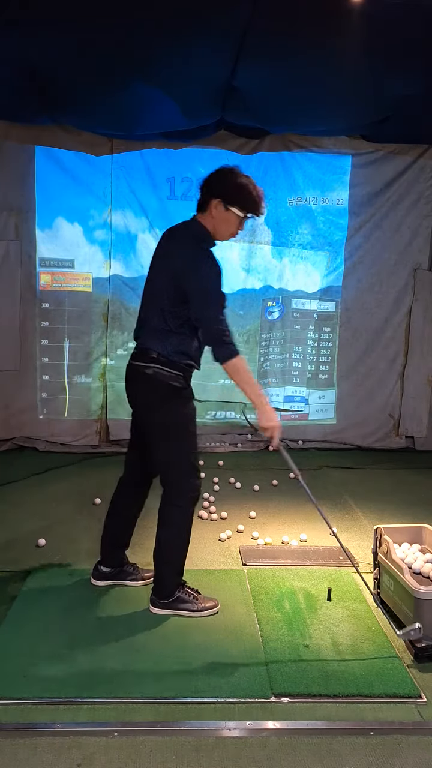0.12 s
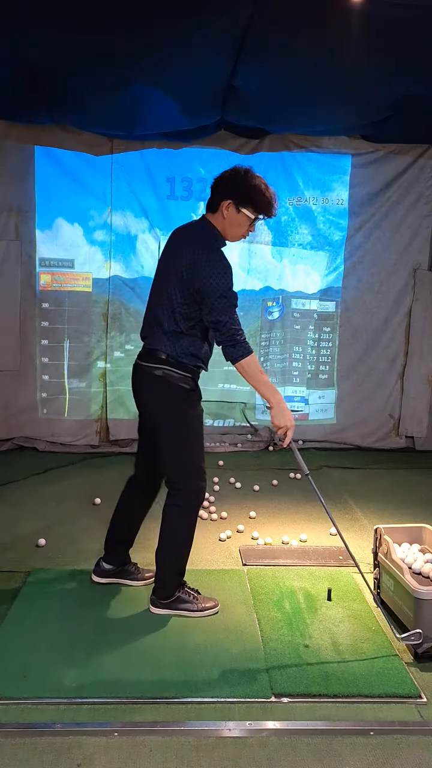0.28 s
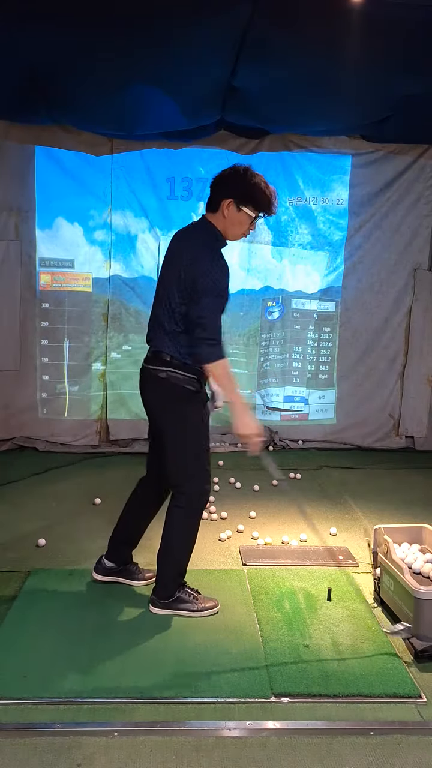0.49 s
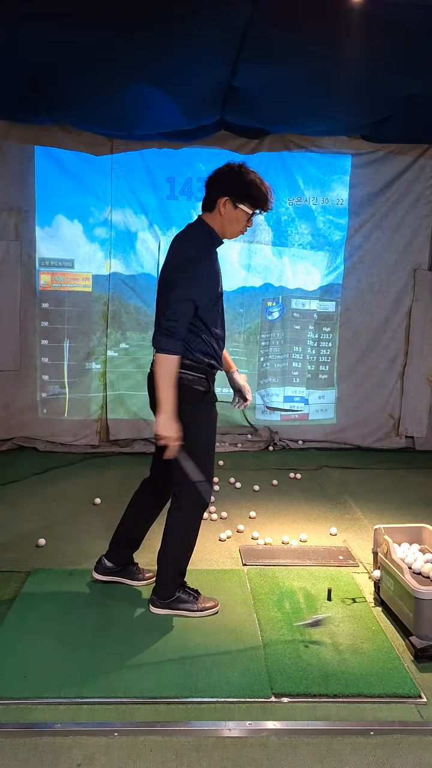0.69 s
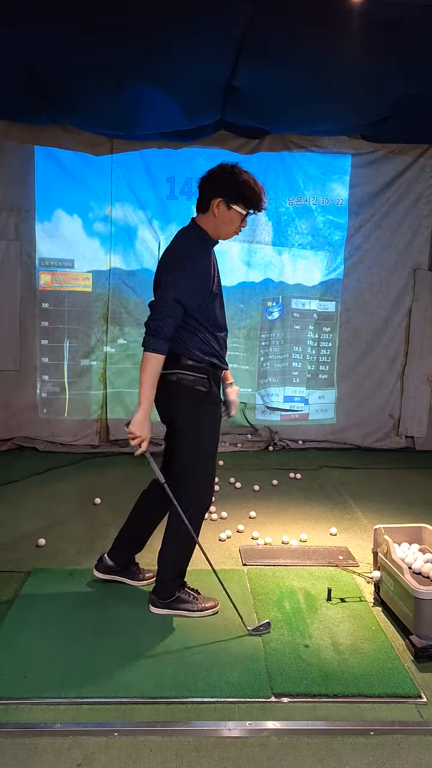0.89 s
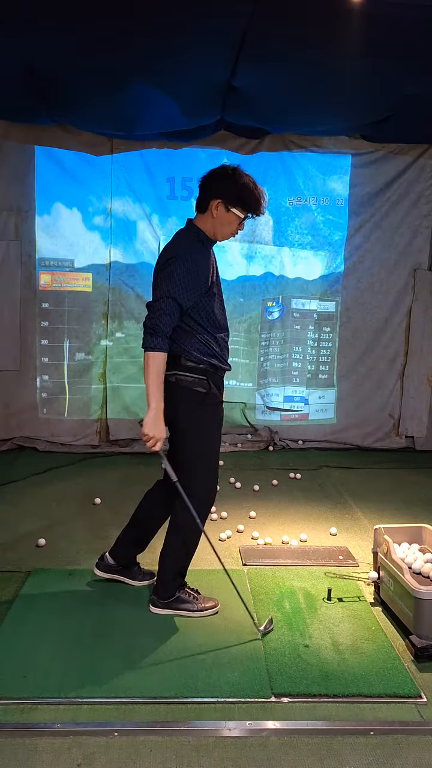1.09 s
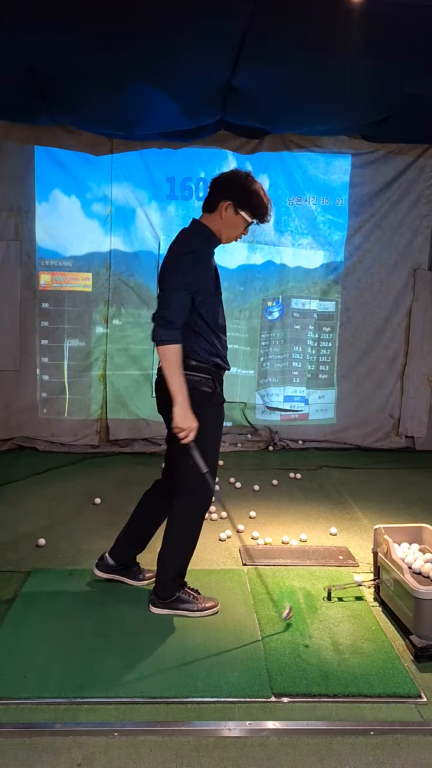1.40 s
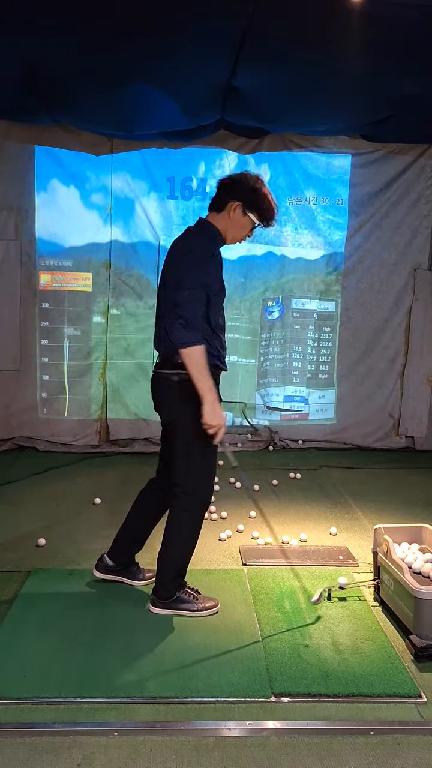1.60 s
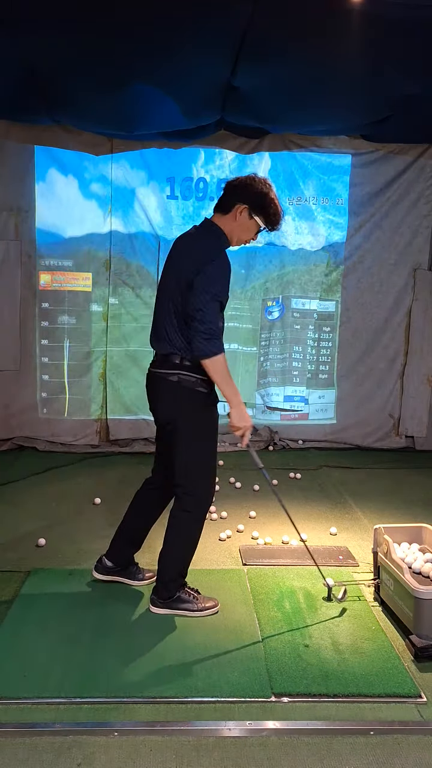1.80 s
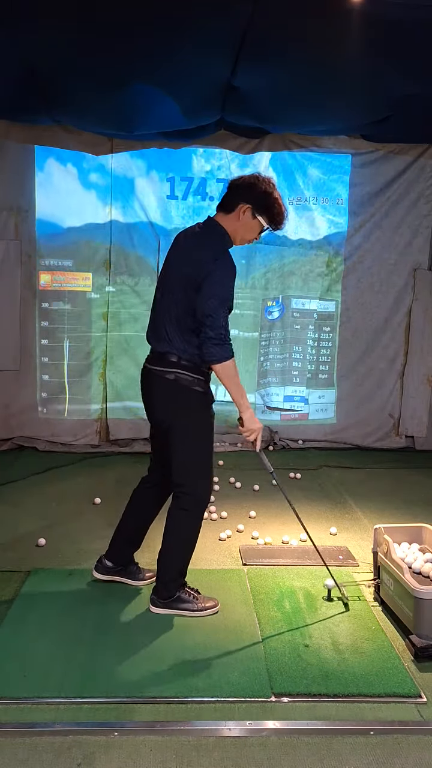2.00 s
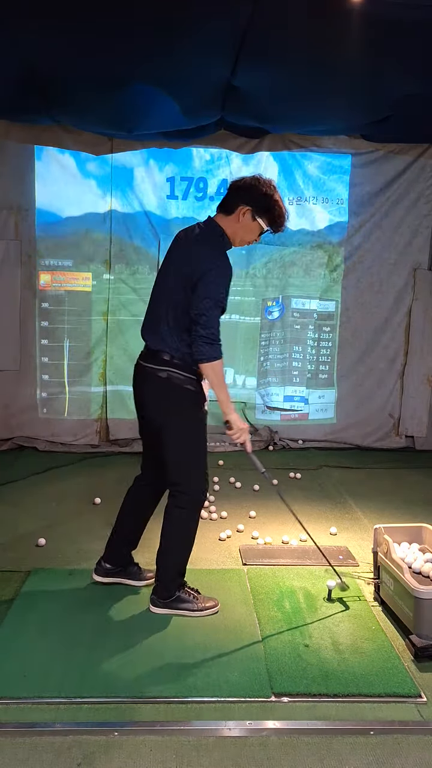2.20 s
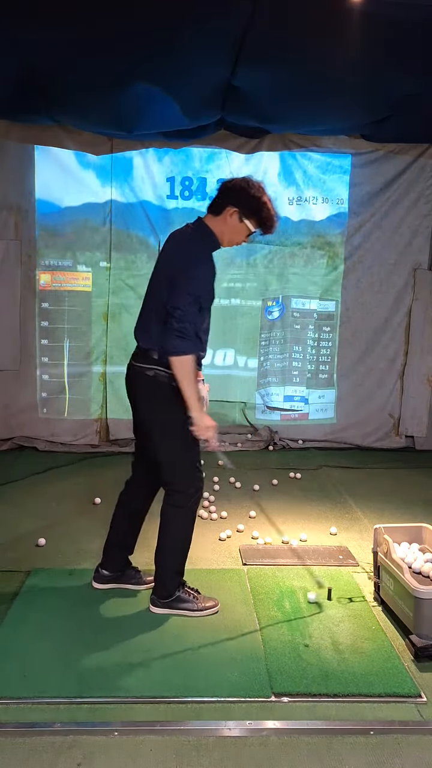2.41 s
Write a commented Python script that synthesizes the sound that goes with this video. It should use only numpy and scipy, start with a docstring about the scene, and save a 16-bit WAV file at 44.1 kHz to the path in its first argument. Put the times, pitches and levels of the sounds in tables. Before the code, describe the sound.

A club rakes golf balls in a hollow plastic tray with a sharp clatter, then brushes the mat

```python
"""Indoor golf bay, heard by a microphone pair over the steady ventilation rumble of a padded room.
First a club head rakes into a plastic tray of balls: random blows ring the tray, its floor and the balls,
which clatter, tumble again and settle. Then the head rubs the turf mat, as bristle clicks and a metal rasp,
and ticks on a ball; meanwhile a small motor hums (a gliding sine), and late on it whines (narrow noise)."""
import sys
import numpy as np
from scipy import signal
from scipy.fft import rfft, irfft, next_fast_len
from scipy.io import wavfile
from scipy.ndimage import uniform_filter1d

SR = 44100
rng = np.random.default_rng(int(sys.argv[2]) if len(sys.argv) > 2 else 0)


def digitize_waveform(pressure):
    """Quantize a signal to 16-bit integers and store it at the path in sys.argv[1].

    Rows of a 2-D input are taken as channels; values are limited to [-1, 1].
    """
    field = np.atleast_2d(pressure).T
    bounded = np.clip(field, -1, 1)
    quanta = np.round(bounded * 32767).astype(np.int16)
    wavfile.write(sys.argv[1], SR, quanta)


N = 114660  # samples, 2.6 s


def amp(db):
    """Amplitude ratio of a level in dB."""
    return 10 ** (np.asarray(db) / 20)


def evened(x):
    """Scales a signal to an RMS of 1."""
    return x / np.sqrt(np.mean(x ** 2) + 1e-20)


def read(points, hz):
    """Reads a table over frequency, joined by lines on a log axis."""
    f, value = np.transpose(points)
    return np.interp(np.log(hz + 1), np.log(f + 1), value)


def curve(rows, col):
    """One column of a table, joined by lines in time."""
    rows = np.array(rows)
    return np.interp(np.arange(N) / SR, rows[:, 0], rows[:, col])


def level(rows, col):
    """Gain from a dB column, with 22 ms fades inside the table's ends; one that reaches the end stays open."""
    t = np.arange(N) / SR
    start, end = rows[0][0], rows[-1][0]
    time_left = np.where(end > 2.59, 1, end - t)
    fade = np.clip(np.minimum(t - start, time_left) / 0.022, 0, 1)
    return amp(curve(rows, col)) * fade


def impulse(points):
    """The shortest causal (minimum-phase) click with this colour, energy 1."""
    log_gain = read(points, abs(np.fft.fftfreq(8192, 1 / SR))) * np.log(10) / 20
    spectrum = np.exp(np.conj(signal.hilbert(log_gain)))
    h = np.fft.ifft(spectrum).real[:2048]
    return h / np.linalg.norm(h)


def resonate(x, hz, width):
    """A one-pole resonance, turned to a fixed or moving pitch."""
    turn = np.exp(2j * np.pi * np.cumsum(hz * np.ones(N)) / SR)
    r = np.exp(-np.pi * width / SR)
    return 2 * (turn * signal.lfilter([1 - r], [1, -r], x / turn)).real


def resonant_noise(hz, width):
    """White noise narrowed by two passes of one resonance, RMS 1."""
    once = resonate(rng.standard_normal(N), hz, width)
    return evened(resonate(once, hz, width))


def grains(per_s, spread_db):
    """Random clicks of either sign, a few of them large, RMS 1."""
    size = amp(spread_db * np.minimum(rng.exponential(1, N), 4)) * rng.choice([-1, 1], N)
    return evened(size * (rng.random(N) < per_s / SR))


def through(x, h):
    """Lets every click of x sound as the impulse h."""
    return signal.oaconvolve(x, h)[:N]


# Hollow modes of the tray: (frequency [Hz], width [Hz], level [dB])
TRAY_MODES = [(204, 38, 4.5), (283, 8.3, 2), (362, 25, -6), (419, 75, 9), (400, 13, -3), (610, 10, 8),
              (735, 30, 2.5), (1149, 25, 8.5), (1224, 99, -15.5), (1530, 87, 3.5)]
# Broad colour of a blow on the tray: (frequency [Hz], level [dB])
TRAY_THUD = [(120, -14.5), (200, -1.5), (600, -2), (878, -11.5), (2500, -18), (3250, -37), (5500, -120)]
RING_DB = -7.5  # all modes together, against the thud


def tray_ring():
    """One blow on the tray: a broad thud and its decaying hollow modes, energy 1."""
    t = np.arange(2048) / SR
    modes = 0
    for hz, width, db in TRAY_MODES:
        decay = np.sqrt(width) * np.exp(-np.pi * width * t)
        modes = modes + amp(db) * decay * np.sin(2 * np.pi * hz * t)
    h = impulse(TRAY_THUD) + amp(RING_DB) * modes / np.linalg.norm(modes)
    return h / np.linalg.norm(h)


DULL_HZ, DULL_HZ_PER_DB = 9160, 88  # upper edge at the loudest, and its fall per dB


def dulled(x, rows, col):
    """Soft clacks lose their top: the upper edge falls with the level, down to 3 kHz."""
    hz, t, z = signal.stft(x, SR, nperseg=256)
    rows = np.array(rows)
    db = np.interp(t, rows[:, 0], rows[:, col])
    edge = np.maximum(DULL_HZ + DULL_HZ_PER_DB * (db - db.max()), 3000)
    z = z / np.sqrt(1 + (hz[:, None] / edge) ** 12)
    return signal.istft(z, SR, nperseg=256)[1][:N]


# Balls tumbling in the tray: (time [s], hollow tray level [dB], ball clack level [dB], boom level [dB])
TUMBLE = [(0.17, -50, -61.5, -40), (0.188, -45, -66.5, -42.5), (0.196, -27, -36.5, -31),
          (0.212, -27, -31.5, -30), (0.248, -20, -19, -21.5), (0.284, -19.5, -27.5, -37.5),
          (0.3, -25, -37, -25), (0.316, -28, -28.5, -28), (0.388, -31.5, -38.5, -27),
          (0.408, -25, -40.5, -27), (0.44, -30.5, -47, -41.5), (0.458, -38, -50, -28.5),
          (0.534, -39.5, -59, -42), (0.56, -41.5, -64.5, -36.5), (0.58, -47.5, -61, -43.5),
          (0.626, -42, -57, -39), (0.65, -38.5, -49, -37.5), (0.676, -29.5, -56, -41),
          (0.69, -35, -51, -38), (0.716, -33, -50.5, -29), (0.75, -40.5, -55, -42),
          (0.772, -43.5, -68.5, -35), (0.794, -40.5, -66, -41), (0.824, -51.5, -65, -42),
          (0.842, -45.5, -67.5, -30.5), (0.862, -44.5, -63, -41.5), (1.0, -65.5, -81.5, -53)]
# Single clear knocks: (time [s], level [dB], clack against the knock [dB], struck panel pitch [Hz])
KNOCKS = [(.198, -16, -8, 330), (.219, -13, -8, 290), (.247, -6, -2, 370), (.261, -6, -12, 610),
          (.279, -8, -14, 390), (.2875, -1, -14, 390), (.305, -14, -14, 290), (.403, -9, -14, 600),
          (.650, -19, -18, 385), (.689, -14, -14, 610), (.705, -14, -22, 400), (.767, -19, -28, 430),
          (.818, -22, -28, 385), (.845, -21, -30, 288)]
# Ball on ball: (frequency [Hz], level [dB])
CLACK = [(450, -26.5), (800, -6), (1200, -0.5), (2200, -5.5), (4100, -8), (5300, -13.5), (7000, -25),
         (9150, -38.5), (11000, -69), (20000, -110)]
# Tray floor on the ground: (frequency [Hz], level [dB])
BOOM = [(40, -40), (90, -14), (135, -3.5), (200, -2), (260, -5), (500, -21.5), (2000, -96)]
THUDS_PER_S, CLACKS_PER_S, BLOW_SPREAD_DB = 900, 5000, 2.5
KNOCK_RING_DB, KNOCK_T60_S = -5.5, 0.1  # panel ring against its knock, and its decay


def balls():
    """Dense small blows and a few clear knocks excite the tray, the balls and the tray floor."""
    ring, clack = tray_ring(), impulse(CLACK)
    low = grains(THUDS_PER_S, BLOW_SPREAD_DB) * level(TUMBLE, col=1)
    high = grains(CLACKS_PER_S, BLOW_SPREAD_DB) * level(TUMBLE, col=2)
    deep = grains(THUDS_PER_S, BLOW_SPREAD_DB) * level(TUMBLE, col=3)
    panels, t = np.zeros(N), np.arange(4096) / SR
    for time, db, clack_db, hz in KNOCKS:
        at = round(time * SR)
        low[at] -= amp(db) / abs(ring).max() / 2
        high[at] -= amp(db + clack_db) / abs(clack).max() / 2
        decay = amp(db + KNOCK_RING_DB - 60 * t / KNOCK_T60_S)
        panels[at:][:4096] -= decay * np.sin(2 * np.pi * hz * t) / 2
    clacks = dulled(through(high, clack), TUMBLE, col=2)
    return panels + through(low, ring) + clacks + through(deep, impulse(BOOM))


# Club head on the turf: (time [s], low rub level [dB], bristle hiss level [dB], metal rasp level [dB])
RUB = [(1.2, -57.5, -66, -80), (1.252, -59, -83, -90), (1.326, -47.5, -60.5, -82), (1.332, -41.5, -71, -80),
       (1.346, -51.5, -66.5, -83), (1.504, -49.5, -76.5, -84), (1.54, -46.5, -73, -79),
       (1.556, -45, -64.5, -94), (1.574, -39.5, -70, -68), (1.58, -50, -64, -57), (1.636, -43, -62, -61.5),
       (1.676, -43, -49.5, -58.5), (1.714, -44, -57.5, -70.5), (1.83, -38.5, -62, -75),
       (1.85, -47, -63, -71), (1.864, -36, -44, -53), (1.878, -41.5, -51, -63), (1.994, -37, -52, -69.5),
       (2.048, -52.5, -58, -76), (2.068, -40, -46, -53), (2.084, -34.5, -48.5, -64), (2.104, -35, -49, -46),
       (2.162, -37, -57.5, -69.5), (2.242, -43, -68, -66.5), (2.256, -48, -62.5, -63),
       (2.302, -46, -58, -68), (2.396, -43.5, -63.5, -62), (2.4, -50, -65, -59)]
# Colour of the low rub: (frequency [Hz], level [dB])
TURF_LOW = [(94, -31.5), (160, 1), (381, -7.5), (410, -5.5), (446, -5.5), (517, -11.5), (2000, -35),
            (2600, -56.5), (4400, -120)]
# Colour of the bristle hiss: (frequency [Hz], level [dB])
TURF_HIGH = [(530, -19.5), (900, 3.5), (1030, 0), (1120, -0.5), (1890, -5.5), (2100, -4), (2620, -7),
             (3710, -13.5), (5610, -21.5), (9000, -52.5), (11700, -82), (19800, -120)]
BRISTLES_PER_S, BRISTLE_SPREAD_DB = 3400, 2
RASP_HZ, RASP_WIDTH_HZ = 3550, 600  # width of each of two passes


def turf():
    """Turf bristles flick under the head as random clicks, and a double resonance makes them rasp."""
    rub = grains(BRISTLES_PER_S / 4, BRISTLE_SPREAD_DB) * level(RUB, col=1)
    hiss = grains(BRISTLES_PER_S, BRISTLE_SPREAD_DB) * level(RUB, col=2)
    rasp = resonate(grains(BRISTLES_PER_S, BRISTLE_SPREAD_DB), RASP_HZ, RASP_WIDTH_HZ)
    rasp = evened(resonate(rasp, RASP_HZ, RASP_WIDTH_HZ)) * level(RUB, col=3)
    return through(rub, impulse(TURF_LOW)) + through(hiss, impulse(TURF_HIGH)) + rasp


# Head on ball: (time [s], level [dB], pitch [Hz], then against that level: broad snap [dB],
# scratch [dB]; scratch t60 [s])
TICKS = [(1.5808, -50, 4320, 8.5, -0.5, 0.06), (1.8607, -40.5, 3420, 5, -8, 0.06),
         (2.0662, -62.5, 3814, 11, 5, 0.06), (2.1056, -42, 3450, 13, -10, 0.06)]
TICK_T60_S = 0.012


def ticks():
    """Head on ball: a short decaying sine, a broad snap and a scratch of band-passed noise."""
    out, t = np.zeros(N), np.arange(4096) / SR
    snap = np.pad(impulse(TURF_HIGH), (0, 2048))
    snap = snap / abs(snap).max()
    for time, db, hz, snap_db, scratch_db, t60 in TICKS:
        band = signal.butter(2, [hz * 0.81, hz * 1.04], "band", fs=SR, output="sos")
        scratch = evened(signal.sosfilt(band, rng.standard_normal(4096)))
        scratch *= amp(scratch_db - 60 * t / max(t60, 0.005))
        tick = amp(-60 * t / TICK_T60_S) * np.sin(2 * np.pi * hz * t)
        out[round(time * SR):][:4096] += amp(db) * (tick + amp(snap_db) * snap + scratch)
    return out


# Motor hum: (time [s], pitch [Hz], level [dB])
HUM = [(1.5, 129.9, -27), (1.532, 127, -56), (1.552, 129, -45.5), (1.664, 133.9, -45), (1.762, 139.2, -53),
       (1.87, 130.8, -37.5), (2.17, 136.8, -39.5), (2.194, 135.1, -40), (2.256, 130.7, -32.5),
       (2.516, 133.8, -41), (2.58, 137, -43), (2.6, 136.2, -42)]
HUM_ROUGH_DB, HUM_WIDTH_HZ = -26, 4  # fuzzy edge against the hum


def motor_hum():
    """A low sine that follows the motor's pitch, with a fuzzy edge of narrow noise."""
    hz = curve(HUM, col=1)
    hum = np.sqrt(2) * np.sin(2 * np.pi * np.cumsum(hz) / SR)
    hum += amp(HUM_ROUGH_DB) * evened(resonate(rng.standard_normal(N), hz, HUM_WIDTH_HZ))
    return hum * level(HUM, col=2)


# Whine strands: (running pitch [Hz], width of each resonance pass [Hz], share of the climb [0-1])
WHINE = [(3100, 120, 0), (3723, 220, 0.89), (3410, 840, 0.15)]
# Level of each noise in a strand: (time [s], strand 1 [dB], strand 2 [dB], strand 3 [dB])
WHINE_LEVEL = [(2.13, -70, -57, -66), (2.154, -73, -72, -69), (2.266, -71, -62.5, -68),
               (2.32, -68, -71.5, -69), (2.414, -72, -65.5, -70), (2.452, -67, -68, -63),
               (2.486, -68, -63.5, -71), (2.536, -71, -71.5, -65.5), (2.6, -71, -63, -70)]
# Climb of the whine: (time [s], offset from the running pitch [Hz])
CLIMB = [(2.24, -260), (2.32, 14)]


def motor_whine():
    """A thin, unsteady whine: each strand is one noise common to both sides plus one for each side."""
    whine, climb = np.zeros((2, N)), curve(CLIMB, col=1)
    for strand, (running_hz, width, share) in enumerate(WHINE, start=1):
        hz = running_hz + share * climb
        for side in whine, whine[0], whine[1]:
            side += resonant_noise(hz, width) * level(WHINE_LEVEL, col=strand)
    return whine


# Left-right likeness of the steady noise: (frequency [Hz], likeness [-1 to 1])
NOISE_LIKENESS = [(60, 0.57), (160, 1), (440, 0.67), (1190, 0.31), (3220, 0.08), (8700, 0.067)]


def wash(points, db):
    """Steady noise of this colour with faint drifting patches, partly alike at the two microphones."""
    frames, hz = N // 512 + 5, np.fft.rfftfreq(2048, 1 / SR)
    a, b, c, d, patches = rng.standard_normal((frames, 1025, 5)).T
    patches = uniform_filter1d(patches, size=24, axis=0)
    patches = evened(uniform_filter1d(patches, size=6, axis=1))  # dB
    same = np.clip(read(NOISE_LIKENESS, hz), -1, 1)[:, None]
    left, other = a + 1j * b, c + 1j * d
    z = np.array([left, same * left + np.sqrt(1 - same ** 2) * other])
    z *= amp(read(points, hz)[:, None] + patches)
    return amp(db) * evened(signal.istft(z, nperseg=2048, noverlap=1536)[1][:, :N])


# Colour of the ventilation rumble: (frequency [Hz], relative level [dB])
RUMBLE = [(18, -36.5), (30, -23), (47, -7), (81, -5.5), (114, -7.5), (155, -10), (245, -10), (279, -16),
          (309, -10.5), (338, -17.5), (433, -16), (1000, -28.5), (1300, -60), (2200, -120)]
# Colour of the ventilation hiss: (frequency [Hz], relative level [dB])
HISS = [(590, -36), (1000, -1.5), (1460, -5.5), (1890, -8.5), (2200, -7.5), (3400, -20.5), (3690, -22),
        (6290, -32), (9000, -65), (11700, -84), (19800, -120)]
# Wavering fan tones: (frequency [Hz], width of each resonance pass [Hz], level [dB])
FAN = [(60.4, 4, -45), (113.5, 4.7, -43.5)]
RUMBLE_DB, HISS_DB = -41.5, -56


def air():
    """Ventilation: coloured noise for rumble and hiss, and two fan tones of narrow noise."""
    fan = sum(amp(db) * resonant_noise(hz, width) for hz, width, db in FAN)
    return wash(RUMBLE, RUMBLE_DB) + wash(HISS, HISS_DB) + fan


# Decay of the padded room: (frequency [Hz], t60 [s])
ROOM_DECAY = [(150, 0.49), (600, 0.33), (2000, 0.093), (6000, 0.1)]
# Room level: (frequency [Hz], level [dB])
ROOM_LEVEL = [(100, -0.5), (400, -3.5), (1500, 0.5), (5000, -0.5)]
# Left-right likeness of the room: (frequency [Hz], likeness [0-1])
ROOM_LIKENESS = [(100, 0.76), (300, 0.94), (800, 0.067), (3000, 0.034)]


def room(x):
    """Sparse reflections of random sign, each band dying at its own speed; the bass is alike on both sides."""
    taps = np.zeros((2, SR // 2))
    slots = np.arange(60, SR // 2 - 20, 20)  # one reflection in every 20 samples
    at = slots + rng.integers(0, 20, (2, len(slots)))
    np.put_along_axis(taps, at, rng.choice([-1., 1.], (2, len(slots))), 1)
    hz, t, z = signal.stft(taps, SR, nperseg=256)
    decay = amp(-60 * t / read(ROOM_DECAY, hz)[:, None])
    decay /= np.linalg.norm(decay, axis=1)[:, None]
    same = np.clip(read(ROOM_LIKENESS, hz), 0, 1)[:, None]
    z = np.array([z[0], same * z[0] + np.sqrt(1 - same ** 2) * z[1]]) * decay
    energy = np.linalg.norm(signal.istft(z, SR, nperseg=256)[1][0])
    z = z * amp(read(ROOM_LEVEL, hz))[:, None]
    tail = signal.istft(z, SR, nperseg=256)[1] / energy
    return signal.fftconvolve(x[None], tail, axes=1)[:, :N]


DIRECT_DB = -2  # balls and club, before the room
SWAY_PER_S = 9  # how fast the sound moves between spots on the floor, in half turns


def scene():
    """Balls and club sound direct and from four floor spots with their own echoes; motor and air join."""
    near = amp(DIRECT_DB) * (balls() + turf() + ticks())
    turn = np.pi * SWAY_PER_S * np.arange(N) / SR
    echo = 0
    for spot in range(4):
        share = np.cos(turn + np.pi * spot / 4) / np.sqrt(2)
        echo = echo + room(near * share)
    return near + echo + motor_hum() + motor_whine() + air()


# Microphone pair: (frequency [Hz], left minus right [dB])
LEAN = [(60, 0.5), (160, 2.5), (440, 1.0), (1190, -2), (3220, 1), (8700, 7)]
EDGE_HZ = 9350


def record(dry):
    """The two microphones differ in colour; then the band limit."""
    size = next_fast_len(N + 8192)
    lean = read(LEAN, np.fft.rfftfreq(size, 1 / SR)) / 2
    pair = irfft(rfft(dry, size) * amp([lean, -lean]), size)[:, :N]
    low_pass = signal.firwin(511, EDGE_HZ, window=("kaiser", 9), fs=SR)
    return signal.oaconvolve(pair, low_pass[None], "same")


dry = scene()
out = record(dry)
digitize_waveform(out)
```